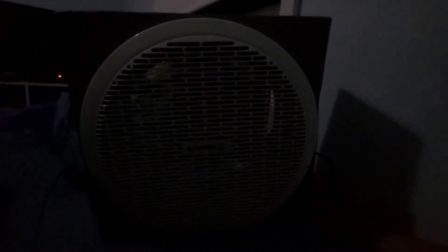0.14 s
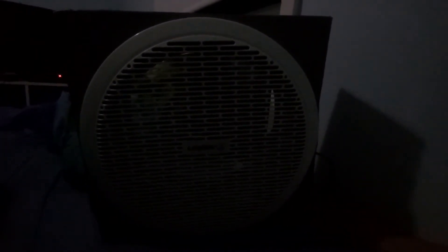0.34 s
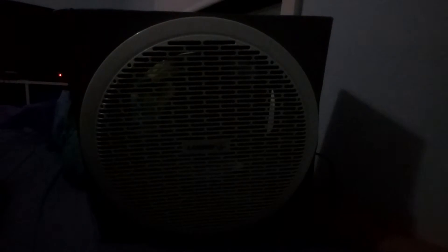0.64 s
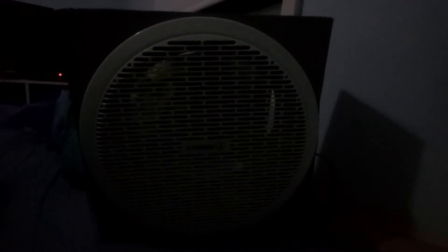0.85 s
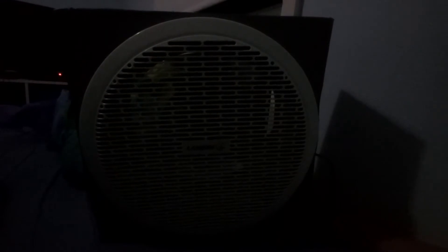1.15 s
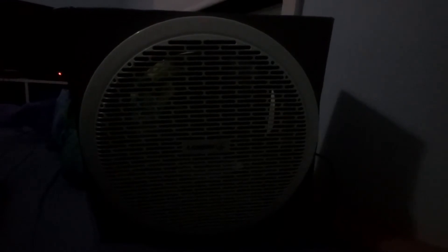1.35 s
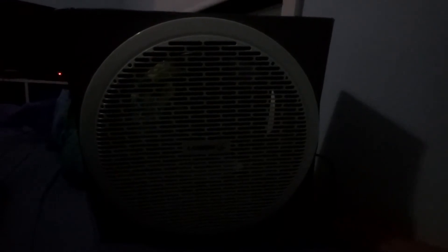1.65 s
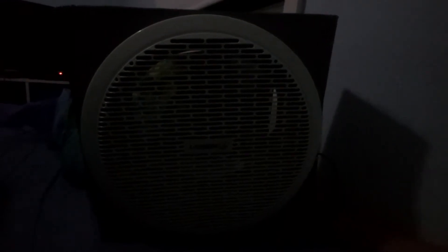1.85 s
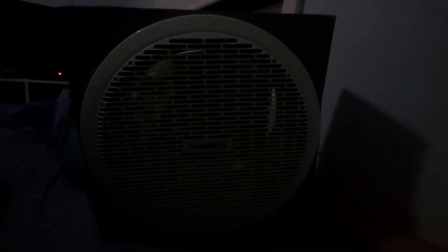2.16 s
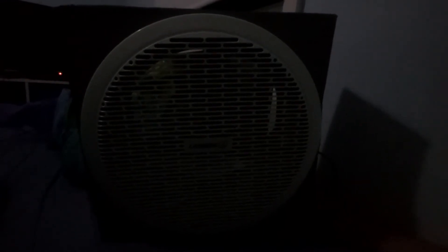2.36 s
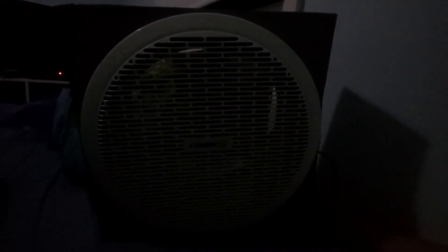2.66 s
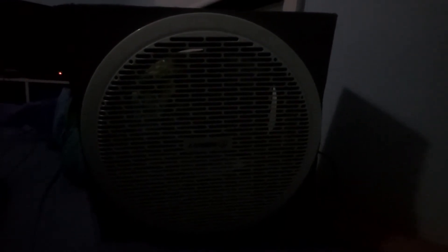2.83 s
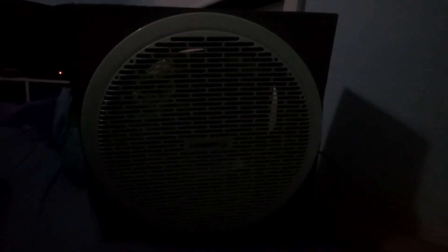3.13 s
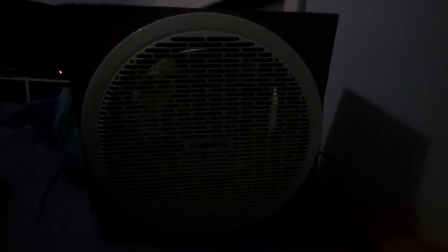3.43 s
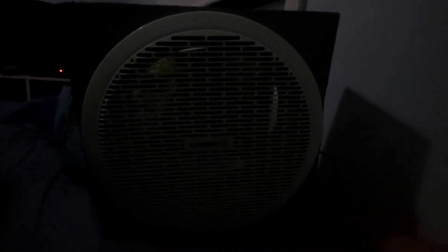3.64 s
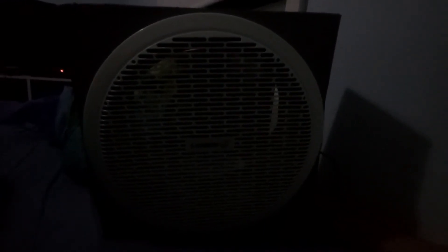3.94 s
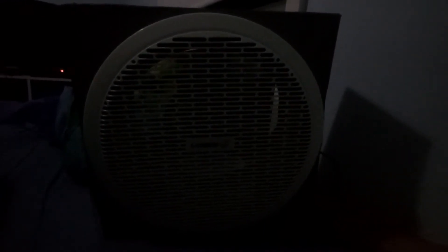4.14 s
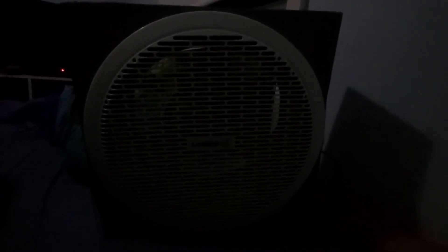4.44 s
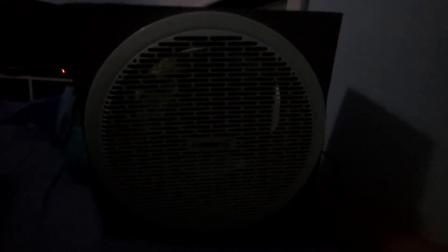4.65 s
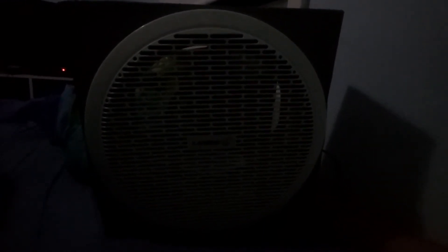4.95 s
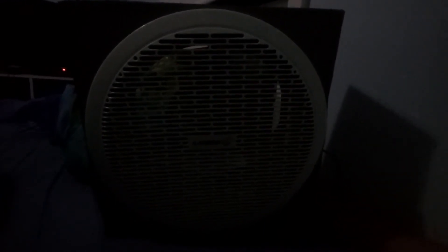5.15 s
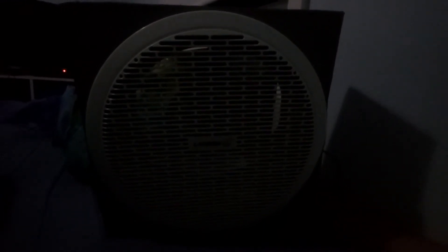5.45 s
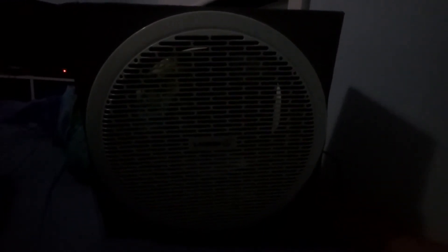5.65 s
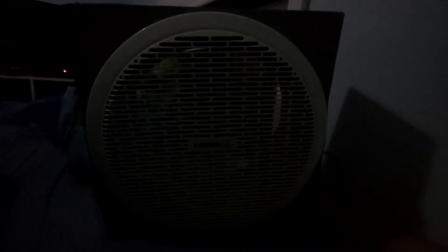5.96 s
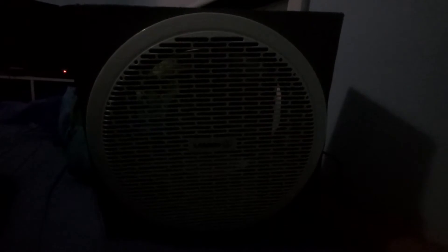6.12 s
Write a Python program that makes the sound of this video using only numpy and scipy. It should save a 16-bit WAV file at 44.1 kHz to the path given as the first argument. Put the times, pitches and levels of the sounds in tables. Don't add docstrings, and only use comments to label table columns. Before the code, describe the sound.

A grilled electric exhaust fan, already turning at the start, runs up to speed in a small room, heard close by a handheld stereo microphone. From 0 to about 3 seconds its three-bladed drone glides up by roughly a fifth in frequency, from near 69 to above 80 hertz, with a comb of overtones rising alongside. The climb is fastest at first. One small, dry tick falls near 0.5 seconds. A fixed 100-hertz motor hum strengthens underneath, and broad, low-mid air rush through the grille grows fuller and brighter. An unsteady whirr, rising to around 139 hertz, wavers throughout, dipping at about 1.2, 2 and 2.7 seconds, surging near 3.2, and dropping briefly around 4.6. From about 4 seconds the pitch nearly levels at 86 hertz; hum and gently gusting air continue until the end, past 6 seconds.

```python
import sys
import numpy as np
from scipy import signal
from scipy.fft import rfft, irfft, next_fast_len
from scipy.io import wavfile

SR = 44100
rng = np.random.default_rng(int(sys.argv[2]) if len(sys.argv) > 2 else 0)


def file_out(sig):
    cols = np.atleast_2d(sig).T
    lim = np.clip(cols, -1, 1)
    pcm = np.round(lim * 32767).astype(np.int16)
    wavfile.write(sys.argv[1], SR, pcm)


def field_ratio(decibels):
    return 10 ** (np.asarray(decibels, dtype=float) / 20)


N = 277389

FULL_HZ = 28.67


def across(hz, table):
    at_hz, *columns = np.transpose(table)
    log_hz = np.log(np.maximum(hz, 1))
    return np.array([np.interp(log_hz, np.log(at_hz), column) for column in columns])


def walk(rate, count=N):
    points = int(count * rate) + 2
    return np.interp(np.arange(count) * rate, np.arange(points), rng.standard_normal(points))


def pan(pan_db):
    return np.array([[pan_db], [-pan_db]]) / 2


def run_up():
    shortfall_hz, run_up_s = 5.68, 2.133
    return FULL_HZ - shortfall_hz * np.exp(-np.arange(N) / SR / run_up_s)


def shaft_angle(shaft_hz):
    return 2 * np.pi * np.cumsum(shaft_hz) / SR + .012 * walk(3 / SR)


def tone(phase, shaft_hz, row, sway_db):
    stages_hz = (24.5, 27.2, 28.2)
    early_db, middle_db, late_db, pan_db, lead_rad = row
    db = np.interp(shaft_hz, stages_hz, (early_db, middle_db, late_db))
    db = db + 2 * np.minimum(shaft_hz - stages_hz[0] + .5, 0)
    share = np.array([[field_ratio(pan_db)], [1]]) / np.sqrt((1 + field_ratio(2 * pan_db)) / 2)
    height = np.sqrt(2) * field_ratio(db + sway_db * walk(4 / SR))
    start_rad = rng.uniform(0, 2 * np.pi)
    return height * share * np.sin(phase + start_rad + np.array([[lead_rad], [0]]))


def blade_passes(angle, shaft_hz):
    # early_db, middle_db, late_db, left_minus_right_db, left_lead_rad
    blade_rows = [(-41, -37, -40, 0, 0.6), (-50, -45, -43, -6, 0.3), (-66, -46, -47, 4, 0.3),
                  (-42, -40, -39, 0, 0.3), (-58, -50, -43, 3, 0.5), (-50, -47, -44, -7, 0.4),
                  (-53, -46, -47, 11, 2.6), (-55, -45, -42, 18, 0.4), (-51, -48, -49, 6, -0.3),
                  (-54, -46, -45, 16, -0.4), (-54, -55, -50, 9, 0.2), (-73, -61, -59, 5, -0.1),
                  (-61, -56, -57, -15, 1.3), (-60, -55, -53, 17, 0.3)]
    brighten_db = .08 * (shaft_hz - 26.5)
    comb = np.zeros((2, N))
    for k, row in enumerate(blade_rows):
        partial = tone(3 * (k + 1) * angle, shaft_hz, row, sway_db=.8 + .08 * k)
        comb += field_ratio(1 + k * brighten_db) * partial
    return comb


def shaft_wobble(angle, shaft_hz):
    # early_db, middle_db, late_db, left_minus_right_db, left_lead_rad
    shaft_rows = [(-63, -59, -58, 0, 0.1), (-74, -70, -54, 0, 0.2)]
    return sum(tone((k + 1) * angle, shaft_hz, row, sway_db=.8) for k, row in enumerate(shaft_rows))


def motor_hum(shaft_hz):
    # early_db, middle_db, late_db, left_minus_right_db, left_lead_rad
    hum_rows = [(-56, -43, -41, 6, 0)]
    hum_hz = 100
    return tone(2 * np.pi * hum_hz * np.arange(N) / SR, shaft_hz, hum_rows[0], sway_db=.8)


def stall_whirr(shaft_hz):
    # centre_s, length_s, level_change_db
    upsets = [(0.0, 0.096, -15), (1.24, .06, -8), (1.973, .2, -12), (2.197, 0.19, 4), (2.515, 0.056, -9),
              (2.675, 0.11, -13), (3.01, 0.15, -15), (3.19, 0.12, 7.5), (3.68, 0.046, -9),
              (4.615, 0.12, -20), (4.816, .06, 5), (4.966, .06, -3), (5.124, 0.051, -8), (5.5, 0.23, -6),
              (6.11, .05, -8)]
    full_speed_hz, fall_hz_per_shaft_hz, wander_hz = 139, 3.7, 6.0
    full_speed_db, fall_db_per_shaft_hz, pan_db = -34, 0.52, -2.6
    now = np.arange(N) / SR
    short_hz = FULL_HZ - shaft_hz
    upset_db = sum(db * np.exp(-(2 * (now - s) / length_s) ** 2) for s, length_s, db in upsets)
    hz = full_speed_hz - fall_hz_per_shaft_hz * short_hz + wander_hz * walk(25 / SR)
    db = full_speed_db - fall_db_per_shaft_hz * short_hz + upset_db
    return np.sqrt(2) * np.sin(2 * np.pi * np.cumsum(hz) / SR) * field_ratio(db + pan(pan_db))


def air_rush(shaft_hz):
    # pitch_hz, growth_db (per 10 % of speed)
    growth = [(40, -1.5), (70, 5.5), (130, 0.5), (250, 2.5), (500, 2), (1500, 3.5), (6000, 4.0),
              (11000, 6.5), (15000, 5.5)]
    gust_db, flicker_db = 0.48, .5
    hz, s, noise = signal.stft(rng.standard_normal((2, N)), SR, nperseg=2048)
    speed = np.interp(s, np.arange(N) / SR, shaft_hz) / shaft_hz[-1]
    steps = np.log(speed) / np.log(1.1)
    growth_db = across(hz, growth)[0][:, None] * steps
    band = np.round(3 * np.log2(np.maximum(hz, 16) / 16)).astype(int)
    flicker = np.array([walk(.2, count=len(s)) for _ in range(band.max() + 1)])[band]
    sway_db = gust_db * walk(0.019, count=len(s)) + flicker_db * flicker
    flow = signal.istft(noise * field_ratio(growth_db + sway_db), SR, nperseg=2048)[1]
    return colour(flow)[:, :N] * np.sqrt(SR / 2)


def colour(flow):
    # pitch_hz, level_db (per Hz)
    air = [(20, -82), (38, -74), (46, -80), (55, -58.5), (75, -59), (110, -57), (290, -52.5), (600, -60.5),
           (1000, -61), (2000, -73), (3000, -82.5), (4100, -85), (4600, -90), (16000, -104)]
    # pitch_hz, left_db, right_db
    port_colour = [(100, 2, 0), (170, 2.5, 4), (241, -0.5, -0.5), (547, -3, -4.5), (693, 3.5, -6),
                   (1170, 0.5, -1.5), (1690, 4.5, -1), (1930, -4, 1), (3040, -2, 0), (5500, -1.5, 3.5),
                   (7140, 7, 2), (8070, -6, -1.5), (14600, -3.5, -2), (15500, 2.5, -5)]
    # pitch_hz, likeness (0-1), left_lead_rad
    likeness_table = [(25, .93, .1), (60, .98, .2), (85, .97, .5), (100, .87, -.1), (130, .98, 0),
                      (185, .88, .55), (290, .995, -.05), (480, .95, .45), (570, .65, 1.7), (900, .65, 0),
                      (1150, .25, .5), (1650, .45, -1.4), (2300, .65, 1.1), (2800, .1, -1.5)]
    # pitch_hz, width_hz, left_boost_db, right_boost_db
    peaks_and_dips = [(219.7, 18.6, 8.5, 2), (307, 52, 3.5, 0.5), (432.7, 48, 4, 6.5), (499, 34, 1, 4),
                      (588.5, 47, 3.5, 9.5), (880, 72, 3.5, -4.5), (932, 46, -3, 6.5), (1700, 230, -3.5, 5.5),
                      (2285, 290, 7, 3),
                      (180, 44, -8, -3.5), (229, 66, -2.5, -3.5), (378, 54, 3.5, 7), (387, 20, -6.5, -6),
            (527, 45, 3.5, 0.5), (689.5, 22, -3, 9.5), (790, 40, 2.5, -5), (1110, 26, -1.5, 8),
            (1125, 140, 0.5, -9), (1534, 83, 1, -8.5), (2070, 95, -9.5, -4), (11300, 1200, 4, 2),
            (13850, 450, -5, -2), (35, 50, -2, 1.5), (4150, 300, 2.5, -4), (15200, 900, 4.5, 0),
            (6600, 500, -1.5, 3), (7250, 600, 2, -5.5), (3100, 250, -1.5, 1.5)]
    size = next_fast_len(2 * flow.shape[1])
    hz = np.fft.rfftfreq(size, 1 / SR)
    shared, own = rfft(flow, size)
    likeness, lead_rad = across(hz, likeness_table)
    likeness = np.clip(likeness, 0, 1)
    left = shared * np.exp(1j * lead_rad)
    right = likeness * shared + np.sqrt(1 - likeness ** 2) * own
    db = across(hz, air) + across(hz, port_colour)
    for centre_hz, width_hz, *boost_db in peaks_and_dips:
        bell = 1 / (1 + (2 * (hz - centre_hz) / width_hz) ** 2)
        db = db + np.array(boost_db)[:, None] * bell
    return irfft(np.array([left, right]) * field_ratio(db), size)


def ticks():
    # start_s, peak_db, left_minus_right_db
    tick_rows = [
        (.46565, -28, 0.5),
    ]
    relax_s, echo_share, echo_samples = .00025, .25, 4
    out = np.zeros((2, N))
    age = np.arange(-80, 81) / SR
    snap = np.sign(age + .5 / SR) * np.exp(-abs(age) / relax_s)
    snap = snap + echo_share * np.roll(snap, echo_samples)
    for s, db, pan_db in tick_rows:
        at = int(s * SR) - len(age) // 2
        out[:, at:at + len(age)] += field_ratio(db + pan(pan_db)) * snap
    return out


def scene():
    shaft_hz = run_up()
    angle = shaft_angle(shaft_hz)
    rotor = blade_passes(angle, shaft_hz) + shaft_wobble(angle, shaft_hz) + motor_hum(shaft_hz)
    return rotor + stall_whirr(shaft_hz) + air_rush(shaft_hz) + ticks()


def top_cut(x):
    return signal.sosfilt(signal.butter(12, 15800, fs=SR, output="sos"), x)


def record(dry):
    top_hz = 15750
    cut = signal.ellip(10, .1, 50, top_hz, fs=SR, output="sos")
    mix = signal.sosfiltfilt(cut, dry)
    return top_cut(mix)


dry = scene()
out = record(dry)
file_out(out)
```